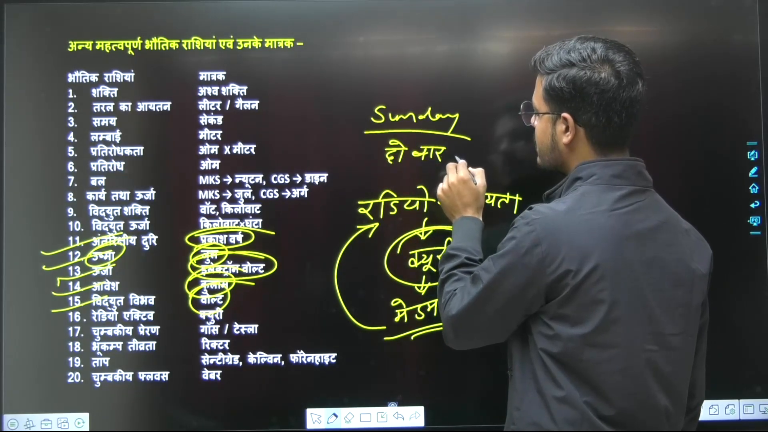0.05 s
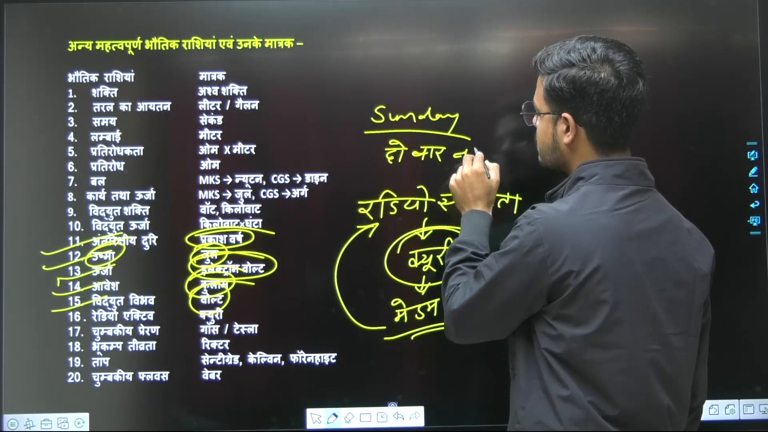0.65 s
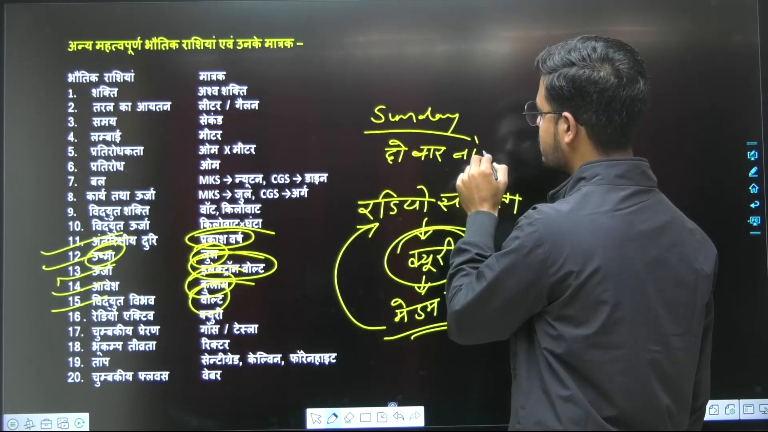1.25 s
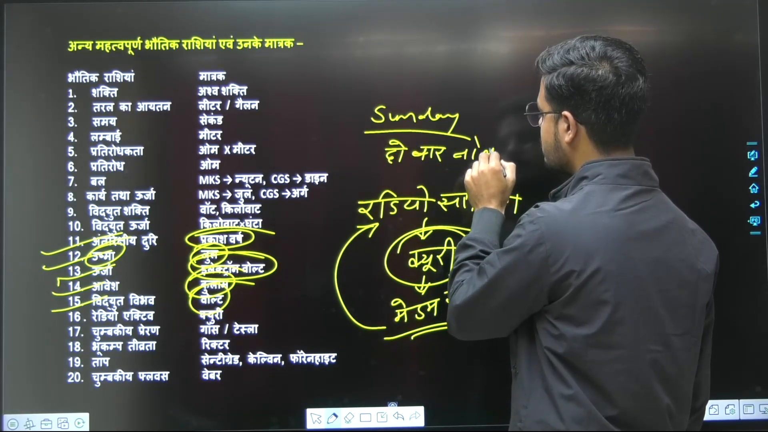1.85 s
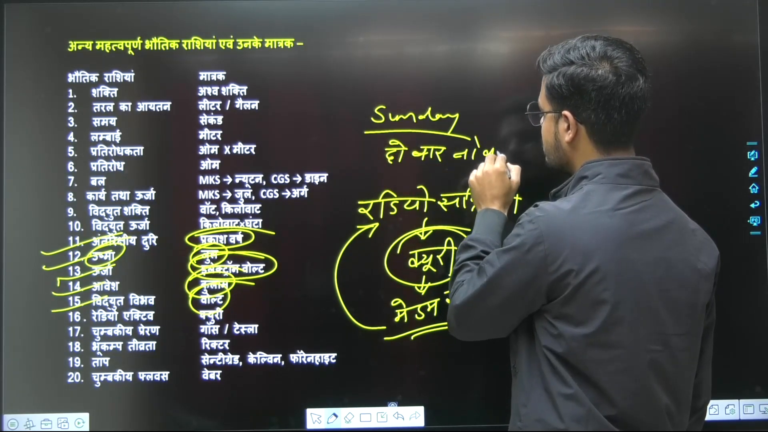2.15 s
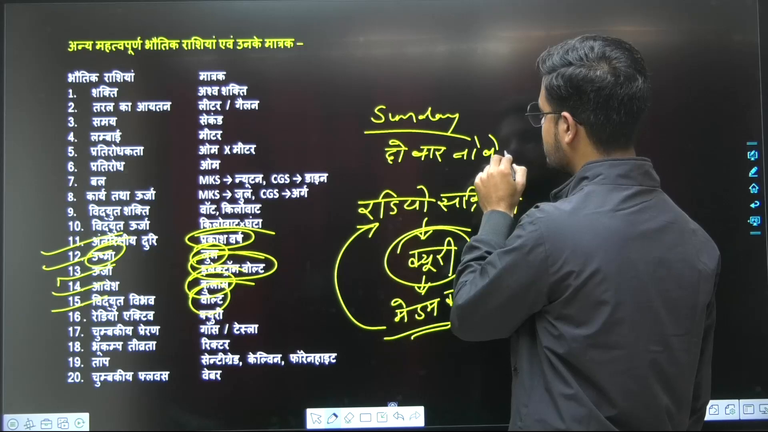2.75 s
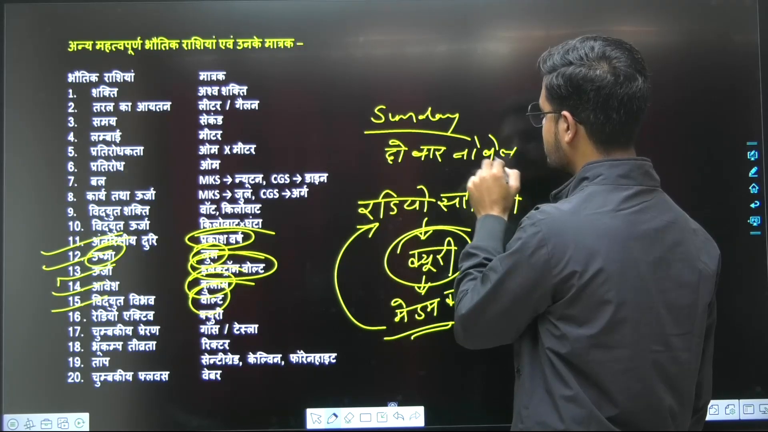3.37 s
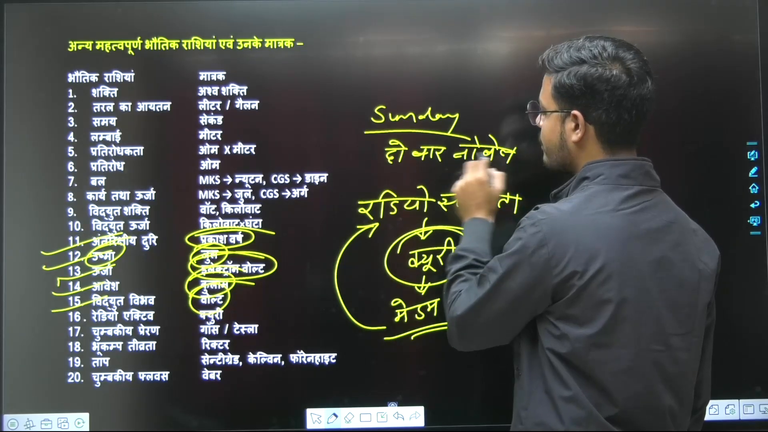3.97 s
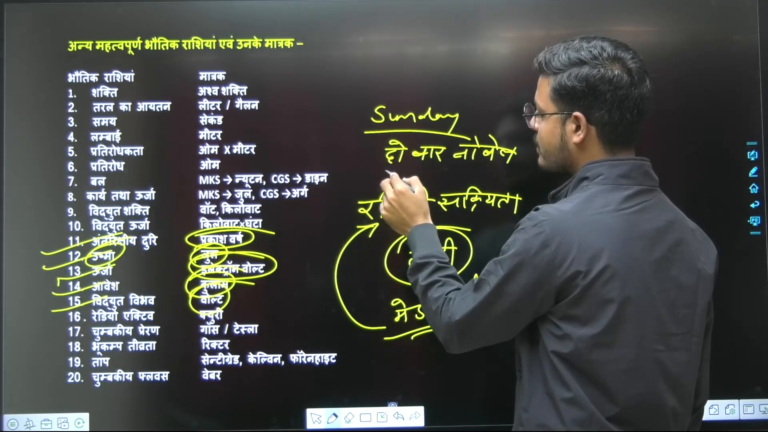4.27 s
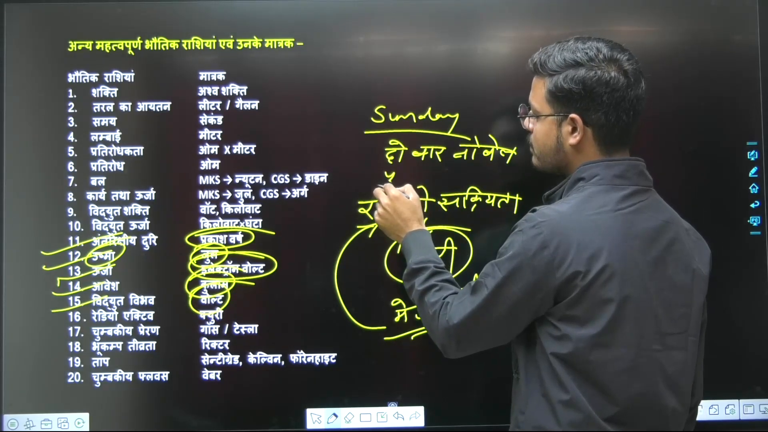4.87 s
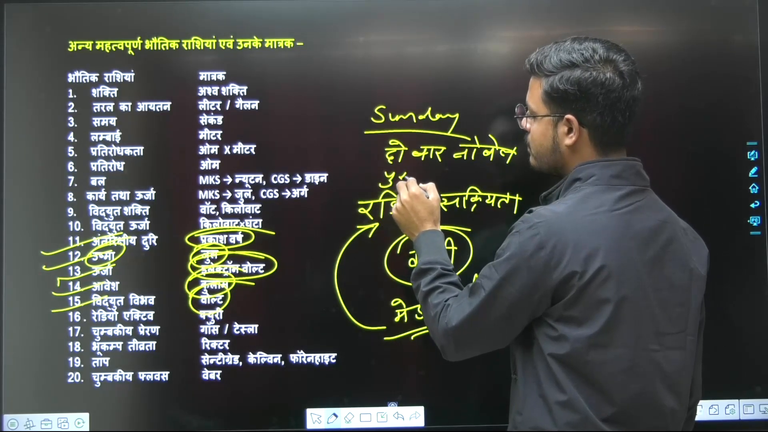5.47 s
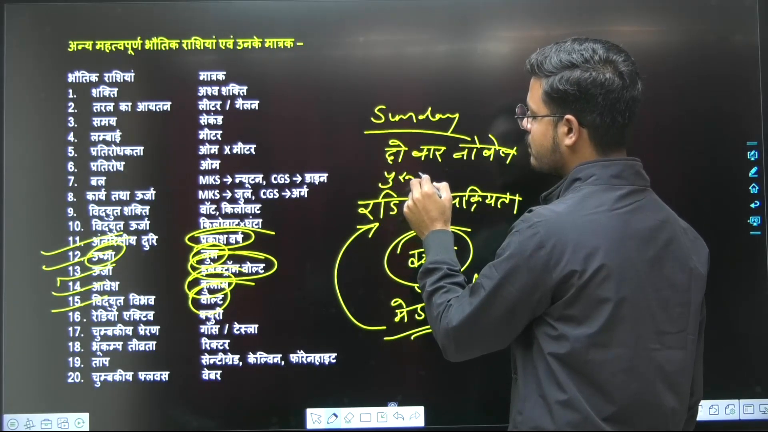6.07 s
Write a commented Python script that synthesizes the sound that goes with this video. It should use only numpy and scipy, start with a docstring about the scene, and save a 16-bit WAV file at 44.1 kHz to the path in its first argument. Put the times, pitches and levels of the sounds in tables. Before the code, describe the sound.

Light, irregular knocks of a pen tip writing on a glass screen, close up, over faint room noise and hiss.

```python
"""A stylus taps on a large glass touch display as it writes, heard close up in a classroom.
Each touch-down knocks the panel's modes, near surfaces echo it and the room rings briefly.
Sleeve and tip rub faintly between taps. Underneath lie soft sub-bass bumps, quiet room noise,
microphone hiss and a thin electronic whine."""
import sys
import numpy as np
from scipy import signal
from scipy.fft import rfft, irfft
from scipy.io import wavfile

SR = 44100
rng = np.random.default_rng(int(sys.argv[2]) if len(sys.argv) > 2 else 0)


def dump_mix(stems):
    """Bounce the given channels to the path in sys.argv[1] as a 16-bit WAV at rate SR."""
    frames = np.atleast_2d(stems).T  # one column per channel
    limited = np.clip(frames, -1, 1)  # hard clip at full scale
    pcm = np.round(limited * 32767).astype(np.int16)
    wavfile.write(sys.argv[1], SR, pcm)


N = 269892
TIME_S = np.arange(N) / SR
RING_S = TIME_S[:SR // 2]  # time axis of one tap

# Gain in dB of the lingering resonances: right side, left side.
LINGER_DB = [0, -0.5]
# Extra damping in dB/s, on top of the panel, room and linger t60s: right side, left side.
DAMP_DB_PER_S = [5.5, 24]
# Each row: start in seconds, level in dB, lift in dB at 230, 1000 and 1500 Hz, contact cutoff in Hz.
TAPS = [(.0530, -24.5, -2, 1, -0.5, 2500), (0.7382, -19, -7, -3.5, -3, 2740),
        (1.122, -23.5, 4, -5.5, -2, 2870), (1.3876, -23, 1.5, -3.5, 1, 2540),
        (2.0729, -25, 7, -6, 1.5, 2650), (2.4006, -24.3, -6.5, -6, 1.5, 2470),
        (2.715, -23.5, 4, -2.5, -1.5, 2450), (3.2077, -21.5, 9.5, -2.5, -1.5, 2630),
        (3.6767, -25, 4.5, -2.5, -5.5, 2840), (4.3697, -24.5, 6.5, -3, -1.5, 2810),
        (5.1731, -30, 3.5, 4, -2, 2780), (5.6215, -26, 5.5, 6.5, 6, 2900)]


def stylus_taps(move_left_s=4.0, usual_db=-24.5, tail_db=-12.0, tick_db=-35.0, thud_db=-28.5, shared=0.55):
    """Touch-downs on the glass. More force gives more thud, relatively less tick and room."""
    out = np.zeros(N)
    paths = [reflection_noise() for _ in range(2)]  # taps on one side share reflections
    for start_s, db, low_db, mid_db, upper_db, contact_hz in TAPS:
        side = int(start_s > move_left_s)  # 0 right, 1 left
        force_db = db - usual_db
        lift = [(230, low_db), (430, 0), (560, 0.0038), (1000, mid_db), (1500, upper_db), (2200, -2.0)]
        knock = panel_knock(side, lift)
        grain = np.sqrt(shared) * paths[side] + np.sqrt(1 - shared) * reflection_noise()
        ring = undb(tail_db) * room_tail(grain, lift) + undb(LINGER_DB[side]) * linger(lift)
        body = knock + early_echoes(knock, side) + undb(-0.53 * force_db) * ring
        body = antiresonance(body) * undb(-DAMP_DB_PER_S[side] * RING_S)
        # the tip cannot drive the panel faster than its contact time
        body = signal.sosfilt(signal.butter(12, contact_hz, fs=SR, output="sos"), body)
        tick = undb(tick_db - 0.75 * force_db) * tip_tick()
        thud = undb(thud_db + 2.05 * force_db) * mount_thud()
        add(out, undb(db) * (body + tick + thud), start_s)
    return out


# Each row: frequency in Hz, level in dB struck on the right, the same on the left, t60 in seconds.
PANEL_MODES = [(440, -40, -22, 0.005), (522, -6.5, -6.5, 0.042), (634, -15.5, -16, 0.02),
               (795, -8, -14, 0.013), (1002, -12, -8, 0.0079), (1108, -16, -21, 0.017),
               (1405, -40, -47, 0.094), (2220, -17.5, -15.5, 0.02), (2780, -29, -25, 0.014)]


def panel_knock(side, lift, detune=0.025, radiate_hz=270):
    """Panel modes pushed inwards. Each spot answers a little differently; little bass radiates."""
    out = 0
    for hz, right_db, left_db, t60_s in PANEL_MODES:
        pitch_hz = hz * (1 + detune * rng.standard_normal())
        db = (left_db if side else right_db) + curve_at(lift, hz)
        out = out - undb(db) * mode(pitch_hz, t60_s)
    return signal.sosfilt(signal.butter(2, radiate_hz, "high", fs=SR, output="sos"), out)


def antiresonance(sound, hz=1755, q=5.4, fill=0.63):
    """The panel answers weakly between its middle modes and the glass ring."""
    notched = signal.lfilter(*signal.iirnotch(hz, q, fs=SR), sound)
    return fill * sound + (1 - fill) * notched


# Each row: frequency in Hz, relative level in dB.
TICK_SPECTRUM = [(3200, -37), (3900, 4), (4600, 5), (6000, 9.5), (8500, 2.5), (11000, -1.5), (15000, -8)]


def tip_tick(decay_s=0.0019, tail_db=-17, tail_s=0.03):
    """The tip's bright tick: a noise burst with a faint tail."""
    fade = np.exp(-RING_S / decay_s) + undb(tail_db) * np.exp(-RING_S / tail_s)
    return fade * noise(TICK_SPECTRUM, len(RING_S))


def mount_thud(build_s=0.0039):
    """A heavy touch shakes the whole display on its mount."""
    shake = mode(hz=62, t60_s=0.086) + undb(-3) * mode(hz=175, t60_s=0.08)
    return shake * (1 - np.exp(-RING_S / build_s))


# Each row: frequency in Hz, level in dB, t60 in seconds.
LINGER_MODES = [(238.4, -39.5, 0.29), (328, -37, 0.22), (369.7, -29, 0.33), (438, -31, 0.17),
                (467, -20, 0.24), (500, -31, 0.23), (595, -35, 0.21)]


def linger(lift, build_s=0.015, scatter_db=3.5):
    """Longer resonances that swell after the knock, in a different mix each time."""
    ring = sum(undb(db + curve_at(lift, hz) + scatter_db * rng.standard_normal()) * mode(hz, t60_s)
               for hz, db, t60_s in LINGER_MODES)
    return ring * (1 - np.exp(-RING_S / build_s))


# One list per side, right then left. Each row: delay in seconds, signed gain.
ECHOES = [
    [(.0081, 0.14), (.0149, -0.12), (.026, 0.18), (.0346, -0.098), (.0359, 0.017), (.041, -0.068),
     (.0551, 0.041)],
    [(.0055, -0.26), (.0082, 0.082), (.0105, -0.065), (.0152, 0.24), (.0215, -0.24), (.0316, -0.1)],
]


def early_echoes(knock, side, cutoff_hz=1700):
    """Near surfaces return the knock and soak up its treble."""
    out = np.zeros_like(knock)
    dulled = signal.sosfilt(signal.butter(1, cutoff_hz, fs=SR, output="sos"), knock)
    for delay_s, gain in ECHOES[side]:
        add(out, gain * dulled, delay_s)
    return out


# Each row: frequency in Hz, relative level in dB.
REFLECTION_SPECTRUM = [(120, -25), (210, -12), (290, -7), (370, 0), (500, 3), (600, -4.5), (720, -9.5),
                       (1200, -13), (1550, -20.5), (1880, -28), (2220, -25.5), (2900, -28.5), (3100, -26.5),
                       (8000, -55)]


def reflection_noise():
    """The room's dense reflections as steady coloured noise."""
    return noise(REFLECTION_SPECTRUM, len(RING_S))


# Each row: band centre in Hz, t60 in seconds.
ROOM_DECAY = [(150, 0.25), (450, 0.23), (800, 0.11), (1300, 0.18), (2600, 0.19), (7000, 0.082)]


def room_tail(grain, lift, build_cycles=6):
    """Reverberation by band: lows swell late and stay, treble comes at once and dies sooner."""
    hz = np.fft.rfftfreq(len(RING_S), 1 / SR)
    spectrum = rfft(grain) * undb(curve_at(lift, hz))
    centres_hz, t60s = np.transpose(ROOM_DECAY)
    out = 0
    for weights, centre_hz, t60_s in zip(np.eye(len(centres_hz)), centres_hz, t60s):
        band = irfft(spectrum * curve_at(np.c_[centres_hz, weights], hz), len(RING_S))
        build = 1 - np.exp(-RING_S * centre_hz / build_cycles)
        out = out + band * build * decay(t60_s)
    return out


# Each row: start in seconds, end in seconds, level in dB.
RUBS = [(.2, .62, -77.5), (1.78, 2.0, -74.5), (2.86, 3.15, -78), (3.3, 3.43, -72), (3.43, 3.66, -70),
        (3.92, 4.35, -71.5), (4.75, 5.05, -73.5)]
SWISHES = [(3.72, 3.92, -74)]
# Each row: frequency in Hz, relative level in dB.
RUB_SPECTRUM = [(200, -3), (450, 5), (750, -3.5), (1300, 0.5), (1900, -6.5), (2400, -9.5), (3500, -19),
                (8000, -43), (14000, -39)]
SWISH_SPECTRUM = [(3000, -8), (5000, -12), (6500, -14), (8000, -5), (9500, -14), (14000, -25)]


def rubbing():
    """Sleeve and tip rub as the hand moves, with one brief high swish."""
    return friction(RUBS, RUB_SPECTRUM, rough_db=1.0) + friction(SWISHES, SWISH_SPECTRUM, rough_db=4.0)


def friction(strokes, spectrum, rough_db, grip_hz=60):
    """Friction noise swells and fades with each stroke while the grip varies."""
    swell = 0
    for start_s, end_s, db in strokes:
        progress = np.clip((TIME_S - start_s) / (end_s - start_s), 0, 1)
        swell = swell + undb(db) * np.sqrt(np.sin(np.pi * progress).clip(0))
    return swell * undb(rough_db * wander(grip_hz)) * noise(spectrum, N)


# Each row: offset into the cycle in seconds, signed size.
BUMP_FIGURE = [(0, 0.93), (.205, -0.88), (0.402, 1.1), (.482, 1.1), (.584, 0.79), (.803, -0.91),
               (.901, 1.1), (.983, -.95)]


def bass_bumps(db=-46, start_s=0.288, cycle_s=1.2045, scatter_db=0.84):
    """Soft sub-bass bumps in a repeating, limping figure: short dip, one swing, slow rebound."""
    out = np.zeros(N)
    for cycle_start_s in np.arange(start_s - cycle_s, N / SR, cycle_s):
        for offset_s, size in BUMP_FIGURE:
            from_peak_s = TIME_S - cycle_start_s - offset_s
            near = np.abs(from_peak_s) < 0.15
            t = from_peak_s[near]
            dip = 0.72 * np.exp(-((t + 0.015) / 0.0049) ** 2)
            swing = np.exp(-(t / 0.012) ** 2)
            rebound = 0.46 * np.exp(-((t - 0.029) / 0.026) ** 2)
            out[near] += size * undb(scatter_db * rng.standard_normal()) * (swing - dip - rebound)
    return undb(db) * out


# Each row: frequency in Hz, relative level in dB.
ROOM_NOISE_SPECTRUM = [(20, -17), (50, -2.5), (74, -6), (88, 2.5), (100, 1.5), (118, -9.5), (175, -6),
                       (215, -11.5), (270, -6), (380, -13.5), (540, -16), (605, -13.5), (720, -18.5),
                       (3000, -43)]


def room_noise(db=-63.0, waver_db=1.0, waver_hz=6):
    """Low, gently wavering room noise."""
    return undb(db - waver_db * wander(waver_hz)) * noise(ROOM_NOISE_SPECTRUM, N)


# Each row: frequency in Hz, relative level in dB.
HISS_SPECTRUM = [(500, 0), (3000, 0), (5000, 0), (9000, -1), (15500, -2.4)]
# Each row: frequency in Hz, rms level in dB.
WHINE_TONES = [(2000, -91), (3000, -95), (4000, -91), (6000, -99), (8000, -104)]


def microphone_noise(hiss_db=-71.4):
    """Steady microphone hiss and thin electronic whine."""
    whine = sum(undb(db) * np.sqrt(2) * np.sin(2 * np.pi * hz * TIME_S) for hz, db in WHINE_TONES)
    return undb(hiss_db) * noise(HISS_SPECTRUM, N) + whine


def undb(db):
    """Gain of a level in dB."""
    return 10 ** (np.asarray(db) / 20)


def curve_at(points, hz):
    """Interpolate (Hz, value) points on a log-frequency axis."""
    points_hz, values = np.transpose(points)
    return np.interp(np.log(np.maximum(hz, 1)), np.log(points_hz), values)


def noise(spectrum, size):
    """Unit-rms noise shaped by (Hz, dB) points."""
    gain = undb(curve_at(spectrum, np.fft.rfftfreq(size, 1 / SR)))
    shaped = irfft(rfft(rng.standard_normal(size)) * gain, size)
    return shaped / shaped.std()


def wander(rate_hz):
    """Random values at rate_hz, joined by straight lines."""
    return np.interp(TIME_S * rate_hz, np.arange(N), rng.standard_normal(N))


def decay(t60_s):
    """Envelope falling 60 dB in t60_s."""
    return np.exp(-np.log(1000) * RING_S / t60_s)


def mode(hz, t60_s):
    """One struck resonance."""
    return np.sin(2 * np.pi * hz * RING_S) * decay(t60_s)


def add(track, sound, start_s):
    """Mix a sound into a track at start_s."""
    i = max(int(start_s * SR), 0)
    part = sound[:max(len(track) - i, 0)]
    track[i:i + len(part)] += part


def scene():
    """One microphone feeds both channels; a trace of hiss differs between them."""
    mid = stylus_taps() + rubbing() + bass_bumps() + room_noise() + microphone_noise()
    side_hiss = undb(-85.7) * noise([(500, -7), (2000, -5), (4000, -2), (10500, 0), (12000, -14)], N)
    return np.array([mid + side_hiss, mid - side_hiss])


def record(dry, cutoff_hz=15700):
    """Steep low-pass on the top treble."""
    return signal.sosfilt(signal.ellip(10, .1, 70, cutoff_hz, fs=SR, output="sos"), dry)


dry = scene()
out = record(dry)
dump_mix(out)
```